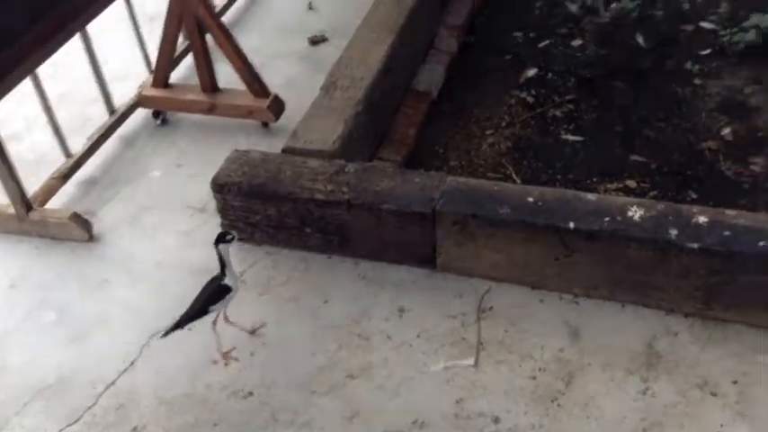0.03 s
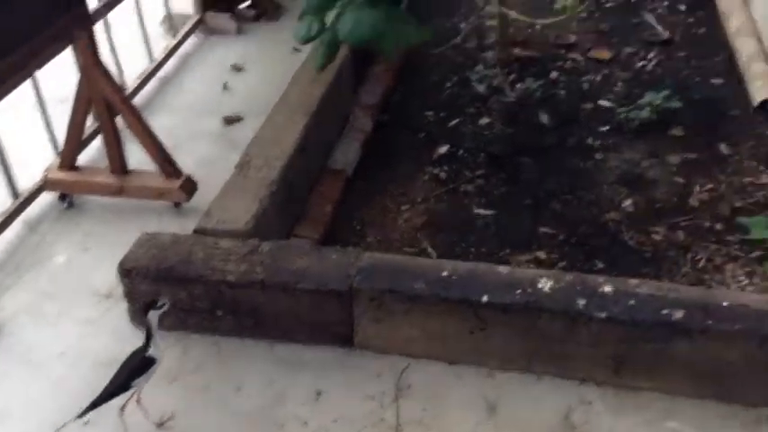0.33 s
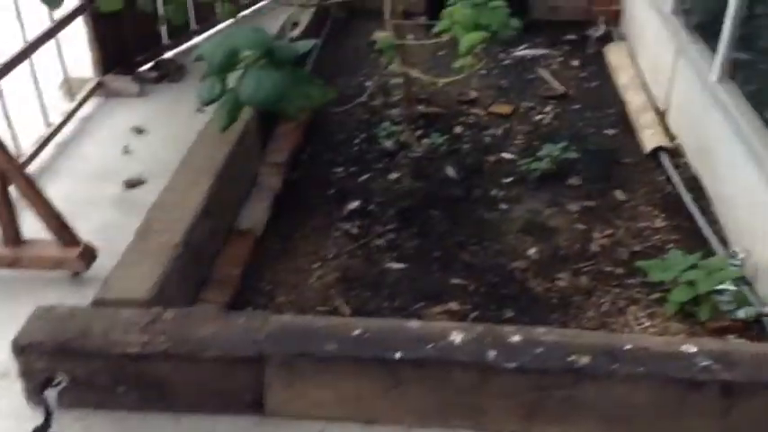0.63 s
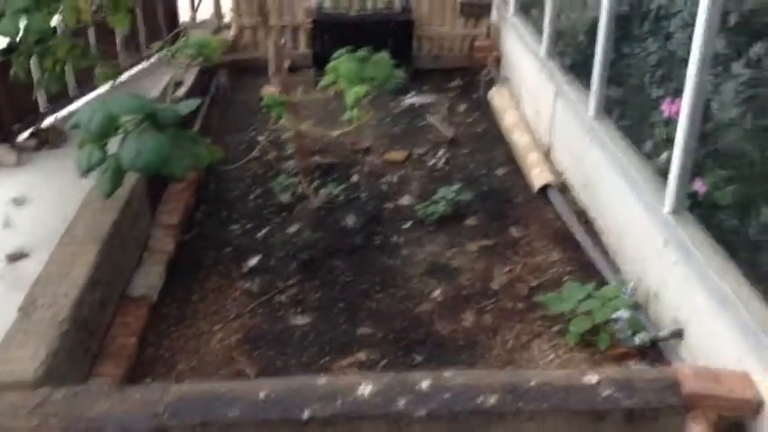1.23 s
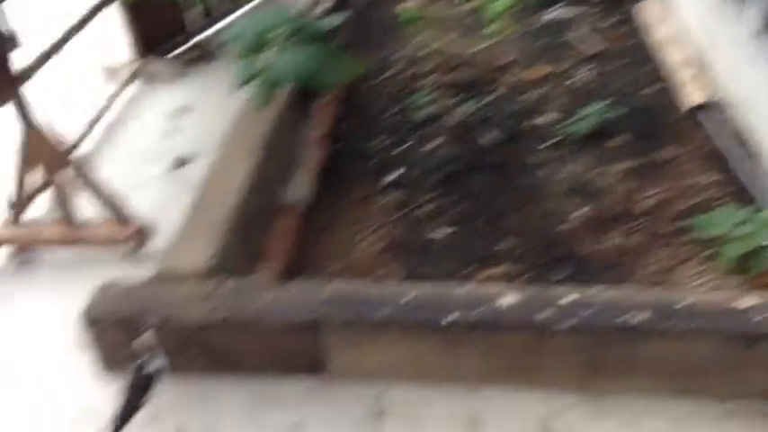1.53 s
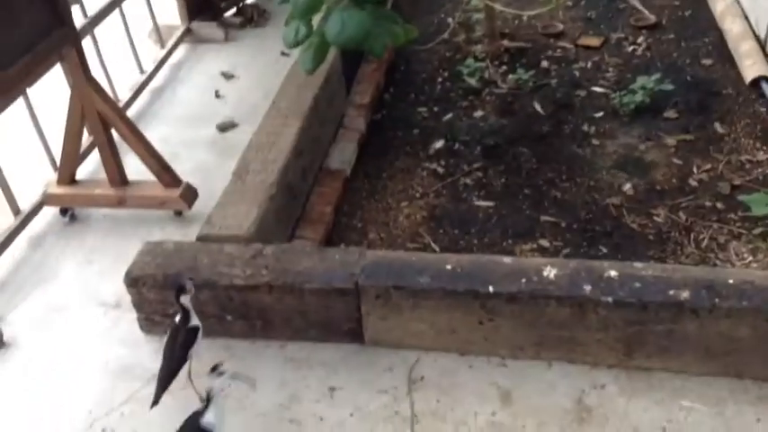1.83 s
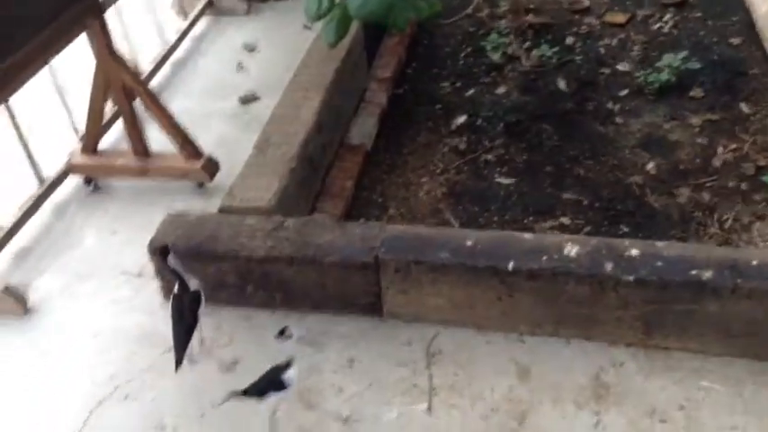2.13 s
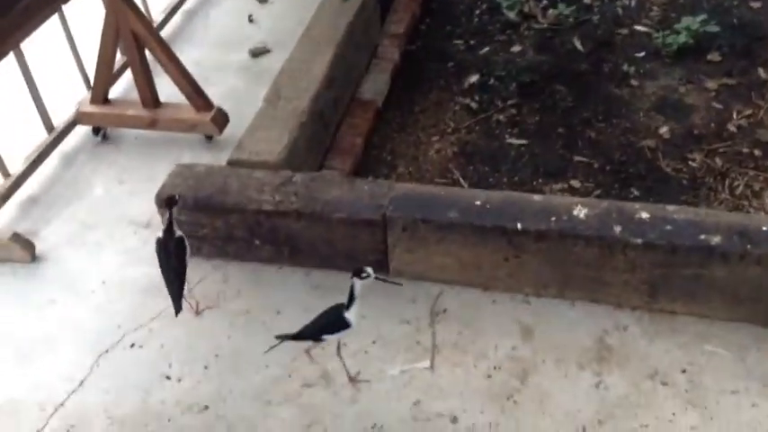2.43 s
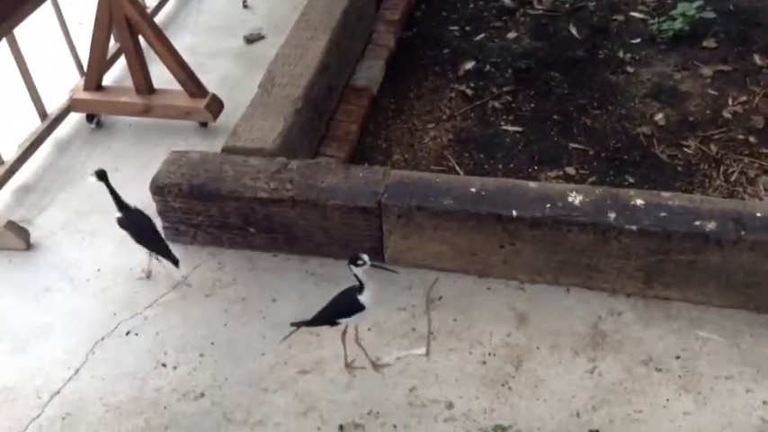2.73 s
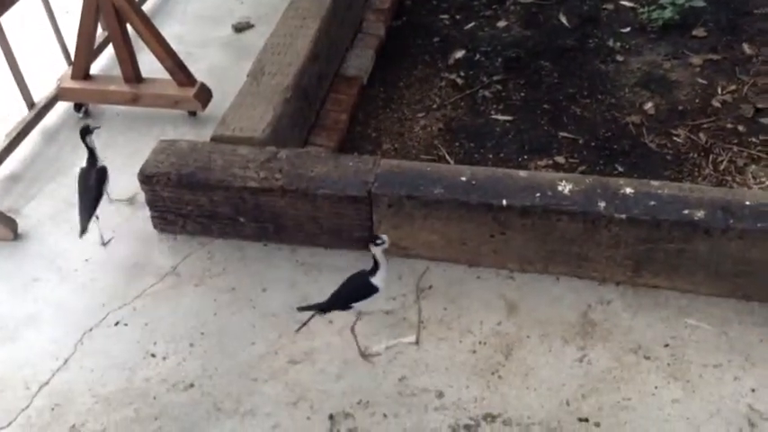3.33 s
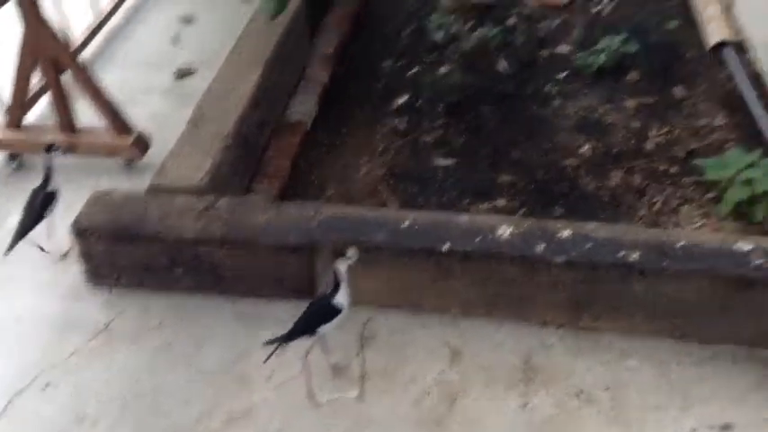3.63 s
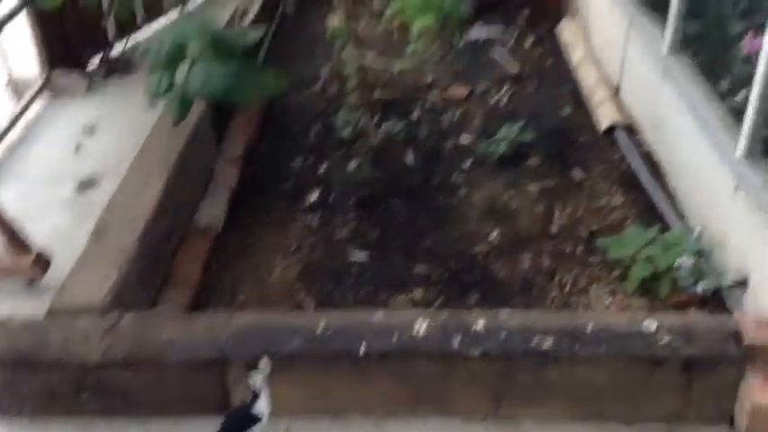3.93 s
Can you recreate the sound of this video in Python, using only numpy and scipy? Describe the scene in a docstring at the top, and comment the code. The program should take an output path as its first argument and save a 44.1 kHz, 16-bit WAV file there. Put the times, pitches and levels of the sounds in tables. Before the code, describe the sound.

Short, high yelps from two stilts repeat quickly outdoors, with an echo and faint hum.

```python
"""Two stilts yelping on a terrace

Each yelp is a short cry, a tone with overtones, that starts hoarse and swoops up.
The bright bird stops near the top; the second, lower one sinks and breaks off in a rasp.
A bounce off the concrete ground colours every call, and the walls echo it.
Far away a motor hums in a soft rumble and hiss."""
import sys
import numpy as np
from scipy import signal
from scipy.fft import rfft, irfft
from scipy.io import wavfile

SR = 44100
rng = np.random.default_rng(int(sys.argv[2]) if len(sys.argv) > 2 else 0)


def master_out(mix):
    """Clip the mix to full scale and print it as 16-bit PCM to the path in sys.argv[1]."""
    frames = np.transpose(np.atleast_2d(mix))
    ceiling = np.clip(frames, -1, 1)
    pcm = np.round(ceiling * 32767).astype(np.int16)
    wavfile.write(sys.argv[1], SR, pcm)


N = 176400


def bright_bird():
    """The higher bird, whose yelps end almost cleanly."""
    # Each row: start in seconds, length in seconds, top pitch in Hz, seconds to reach the top,
    # swoop as a share of the pitch, level in dB, treble boost in dB, the bill's ringing pitch in Hz,
    # its boost in dB, ground bounce delay in milliseconds, bounce strength, dB sent to the walls.
    yelps = [ (-.054, 0.039, 1103, 0.037, .16, -12.5, -2, 3320, -3.5, 0.91, .35, 4.5),
             (.209, 0.045, 1196, 0.027, 0.2, -18.5, -0.5, 6540, -0.5, 1.72, 0.51, 8.5),
             (.446, 0.038, 1187, 0.028, 0.093, -14, -0.5, 3660, 0.5, 1.02, 0.48, 6),
             (.692, 0.041, 1081, 0.041, 0.18, -16, -1.5, 5450, 4, 1.05, 0.6, 4.5),
             (.964, 0.038, 1167, 0.029, 0.13, -12, 2.5, 3810, 8, 2.02, 0.25, 3.5),
             (1.260, 0.043, 1073, 0.041, 0.15, -10.5, -1, 5060, 5.5, 0.31, 0.46, -0.5),
             (1.550, 0.039, 1089, 0.042, 0.12, -9.5, -1, 9600, 6.5, 1.348, 0.31, -1),
             (1.955, .044, 1009, 0.033, 0.14, -12.5, 3.5, 7600, 5, 1.49, 0.52, -0.5),
             (2.338, 0.045, 1019, 0.0343, 0.13, -9.5, -3, 7800, 5, 2.65, 0.33, -5),
             (2.667, 0.05, 1036, 0.035, 0.2, -9.5, -2.5, 3523, 1, 2.65, 0.39, -3),
             (3.005, 0.046, 1058, 0.031, 0.12, -10, -3, 4050, 3, 1.52, 0.33, -5.5),
             (3.314, 0.04, 1057, 0.038, .17, -11, 0, 5640, 2, 2.4, 0.15, -2.5),
             (3.602, 0.043, 1012, 0.0378, 0.15, -12, 1, 7900, 3.5, 1.21, 0.12, -0.5)]
    # The tone colour of throat and bill. Each row: frequency in Hz, boost in dB.
    throat = [(750, -20), (1100, -16), (1500, -2.5), (2000, -5), (2900, -1), (3500, -4), (4100, -6),
              (5000, -8.5), (6000, -11.5), (7000, -15.5), (8200, -19), (9200, -28), (10300, -13),
              (12000, -21.5), (15500, -24.5)]
    voice = dict(sag_per_s2=62, break_share=0.0086, break_s=0.005, end_rasp=.06, steady_rasp=0.044,
                 swell_db=11, treble_swell_db=16, release_s=.007, shimmer_db=2.05, jitter=0.0015)
    return calls(yelps, throat, voice)


def low_bird():
    """The lower bird, whose voice drops and cracks at the end of each yelp."""
    # Its yelps and its tone colour, with the same columns as in bright_bird.
    yelps = [ (1.397, 0.053, 968, 0.033, 0.17, -12, 4.5, 4380, 5, 1.04, 0.12, 0.25),
             (1.862, 0.049, 986, .028, 0.16, -12, 2.5, 3020, 1.3, 1.29, 0.51, 0),
             (2.265, 0.049, 989.6, 0.027, 0.17, -11.5, 1.5, 2000, 2.6, 1.24, 0.49, 0.00053),
             (3.028, 0.057, 1013, 0.0314, .15, -15, 3, 2900, 1.7, 1.11, 0.39, 0),
             (3.474, 0.055, 997, 0.0323, .16, -14.5, -2.5, 6170, 5.2, 0.986, 0.27, 0.35),
             (3.802, .056, 992, 0.031, 0.14, -12.5, 0, 3800, 2.9, 1.18, 0.12, 0),
             (3.985, .056, 1000, 0.027, 0.13, -14.5, 11, 3070, 0.63, 1.18, 0.29, 0.0056)]
    throat = [(750, -13.5), (1000, -18), (1500, -6.5), (2000, -9), (2500, -4.5), (3000, 1), (3500, -4),
              (4100, -11), (5000, -8), (6000, -26), (7000, -25.5), (9200, -33), (10300, -28.5),
              (12000, -33.5), (15500, -40)]
    voice = dict(sag_per_s2=54.4, break_share=0.0608, break_s=.008, end_rasp=0.31, steady_rasp=0.059,
                 swell_db=13, treble_swell_db=12, release_s=0.0091, shimmer_db=3, jitter=0.0042)
    return calls(yelps, throat, voice)


def calls(yelps, throat, voice):
    """One bird's yelps as two tracks: straight to us with a ground bounce, and out to the walls."""
    direct, outward = np.zeros((2, N + 2 * SR))
    lead_s = .008   # the sound starts this far ahead of the listed time
    t = np.arange(SR // 10) / SR - lead_s
    low_cut = signal.butter(3, 700, "high", fs=SR, output="sos")   # the cries keep nothing below about 700 Hz
    for start, length, top_hz, rise_s, swoop, db, *colour, delay_ms, bounce_share, echo_db in yelps:
        cry = yelp(t, length, top_hz, rise_s, swoop, *colour, throat, voice)
        cry = from_db(db) * signal.sosfilt(low_cut, cry)
        khz = np.fft.rfftfreq(len(cry), 1000 / SR)
        bounce = irfft(rfft(cry) * np.exp(-2j * np.pi * khz * delay_ms))   # a delayed copy
        add(direct, start - lead_s, cry + bounce_share * bounce)
        add(outward, start - lead_s, cry * from_db(echo_db))
    return np.array([direct, outward])


def yelp(t, length, top_hz, rise_s, swoop, treble_db, bill_hz, bill_db, throat, voice):
    """One cry: overtones sweep through the throat's colour, louder and brighter as effort grows."""
    attack_s, swell_s, hoarse_s, bill_width_octaves = .014, 0.026, 0.014, 0.14
    breaking = np.clip((t - length) / voice["break_s"] + 1, 0, 2)
    hoarse = .5 * np.exp(-(np.maximum(t, 0) / hoarse_s) ** 2)
    hoarse += voice["end_rasp"] * np.minimum(breaking, 1)
    below_top = swoop * np.maximum(1 - t / rise_s, 0) ** 2
    sag = voice["sag_per_s2"] * np.maximum(t - rise_s, 0) ** 2
    jitter = (voice["jitter"] + 0.018 * hoarse) * wobble(len(t), hz=500)
    pitch = top_hz * (1 - below_top - sag) * np.exp(jitter - voice["break_share"] * breaking ** 2)
    phase = 2 * np.pi * np.cumsum(pitch) / SR
    slack = np.maximum(1 - t / swell_s, 0) ** 2   # falls to 0 at full effort
    shared_flutter = wobble(len(t), hz=553)
    tone = 0
    for k in range(1, 19):
        treble_share = np.clip(np.log2(k) - 2, 0, 1)   # none up to 4 times the pitch, full from 8
        db = at_hz(throat, k * pitch) + treble_share * (treble_db - voice["treble_swell_db"] * slack)
        db += voice["shimmer_db"] * wobble(len(t), hz=85)
        db += bill_db * np.exp(-(np.log2(k * pitch / bill_hz) / bill_width_octaves) ** 2)
        flutter = (shared_flutter + wobble(len(t), hz=553)) / np.sqrt(2)
        rough = 1 + (hoarse + voice["steady_rasp"]) * flutter
        tone += from_db(db) * rough * np.sin(k * phase + rng.uniform(0, 2 * np.pi))
    # In a hoarse voice, strong and weak vibrations take turns.
    uneven = (1 + 0.49 * hoarse * np.sin(phase / 2)) / np.sqrt(1 + hoarse ** 2)
    fade_in = np.clip((t - t[0]) / attack_s, 0, 1)
    fade_out = np.clip(.5 + .5 * (length - t) / voice["release_s"], 0, 1)
    return tone * uneven * fade_in * fade_out * from_db(-voice["swell_db"] * slack)


def wall_echo(sound):
    """The walls give a quick scatter of echoes and a longer tail; the treble dies sooner."""
    wall_delay_s, split_hz = 0.0079, 5560
    t = np.arange(SR) / SR
    arrival = np.clip(t / wall_delay_s - .5, 0, 1)
    response = np.zeros(SR)
    for band, time_share, band_db in (("low", 1, 0), ("high", 0.72, -1.5)):
        tail = 0
        for db, fade_s in ((-8, 0.23), (-8.5, 0.73)):   # the scatter, then the tail
            decay = np.exp(-np.log(1000) * t / (fade_s * time_share))
            tail += from_db(db) * rms_one(rng.standard_normal(SR) * arrival * decay) / np.sqrt(SR)
        band_filter = signal.butter(3, split_hz, band, fs=SR, output="sos")
        response += from_db(band_db) * signal.sosfilt(band_filter, tail)
    return signal.fftconvolve(sound, response)[:len(sound)]


def motor():
    """A distant motor sings wavering tones at 4 to 9 times its speed, over a faint mains hum."""
    # The motor's speed. Each row: time in seconds, turns per second.
    speeds = [(0, 51), (.9, 50.36), (1.5, 49.4), (1.85, 50.27), (2.4, 51.41), (4, 51.58)]
    # Its strongest tones. Each row: time in seconds, relative dB at 4, 5 and 6 times the speed.
    strong_tones = [(0.0, -55, -41, -52), (0.08, -44, -55, -49), (0.66, -67.5, -57.5, -76.5),
                    (1.68, -55.5, -42, -41.5), (2.04, -50.5, -53.5, -49), (3.9, -43.5, -54.5, -48),
                    (4.0, -39, -53, -49)]
    # The tones at 7, 8 and 9 times the speed, in dB compared with the one at 6 times.
    upper_db = [-4.5, -8, -10]
    t = np.arange(N) / SR
    times, *columns = np.transpose(strong_tones)
    levels = [np.interp(t, times, db) - 2 for db in columns]
    levels += [levels[-1] + db for db in upper_db]
    speed = np.interp(t, *np.transpose(speeds)) * (1 + 0.0047 * wobble(N, hz=3.1))
    phase = 2 * np.pi * np.cumsum(speed) / SR
    hum = from_db(-61) * np.sin(2 * np.pi * 120 * t)   # the mains
    for k, db in enumerate(levels, start=4):
        waver_db = 2.5 * wobble(N, hz=4.7)
        hum += from_db(db + waver_db) * np.sin(k * phase + rng.uniform(0, 2 * np.pi))
    return np.sqrt(2) * hum


def distant_noise():
    """A steady wash of hiss and low rumble from far away."""
    # The tone colours of the airy hiss and the rumble. Each row: frequency in Hz, relative level in dB.
    air = [(30, -48), (64, -30), (109, -18.5), (220, -4.5), (440, -10.5), (700, -8.5), (1000, -6),
           (1500, -7.5), (3000, -6.5), (5000, -12.5), (7000, -12), (10000, -15), (15500, -24.5)]
    rumble = [(30, -42), (60, -25), (90, -33), (125, -5.5), (170, -3.5), (220, 0), (320, -4), (450, -14.5),
              (700, -5), (1200, -29), (3000, -30)]
    return from_db(-38) * coloured_noise(air) + from_db(-46) * coloured_noise(rumble)


def from_db(db):
    """Turn decibels into a number to multiply by."""
    return 10 ** (np.asarray(db) / 20)


def rms_one(x):
    """Scale a signal so that its typical size (root mean square) is 1."""
    return x / np.sqrt(np.mean(x ** 2) + 1e-20)


def at_hz(colour, hz):
    """Look up the dB of a tone colour at any frequency, sliding between its rows."""
    row_hz, db = np.transpose(colour)
    return np.interp(np.log(np.maximum(hz, 1)), np.log(row_hz), db)


def wobble(size, hz):
    """A random wiggle of typical size 1, moving up to about hz times a second."""
    padded = size + SR // 10
    rolloff = 1 + (np.fft.rfftfreq(padded, 1 / SR) / hz) ** 4
    return rms_one(irfft(rfft(rng.standard_normal(padded)) / rolloff))[:size]


def coloured_noise(colour):
    """Steady noise of typical size 1 with the given tone colour."""
    gains = from_db(at_hz(colour, np.fft.rfftfreq(N, 1 / SR)))
    return rms_one(irfft(rfft(rng.standard_normal(N)) * gains, N))


def add(track, start_s, sound):
    """Mix a sound into a track that has one spare second at the front."""
    i = int((start_s + 1) * SR)
    track[i:i + len(sound)] += sound[:len(track) - i]


def scene():
    """Both birds and their echoes over the distant background."""
    direct, outward = bright_bird() + low_bird()
    background = distant_noise() + motor()
    birds = (direct + wall_echo(outward))[SR:SR + N]   # drop the spare second
    return (birds + background)[None]


def record(dry):
    """Clip peaks at full scale and cut the treble above 15700 Hz."""
    top_cut = signal.ellip(10, .1, 80, 15700, fs=SR, output="sos")
    return signal.sosfilt(top_cut, np.clip(dry, -1, 1))


dry = scene()
out = record(dry)
master_out(out)
```